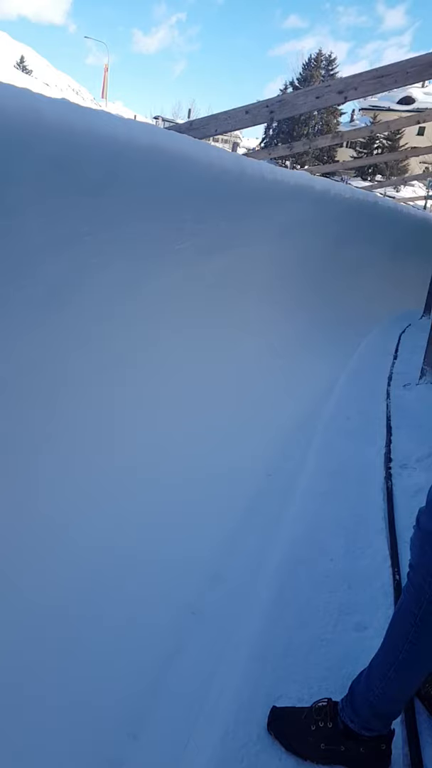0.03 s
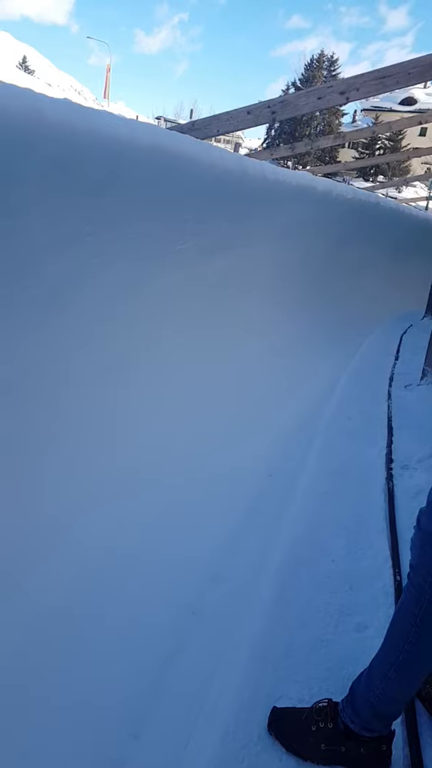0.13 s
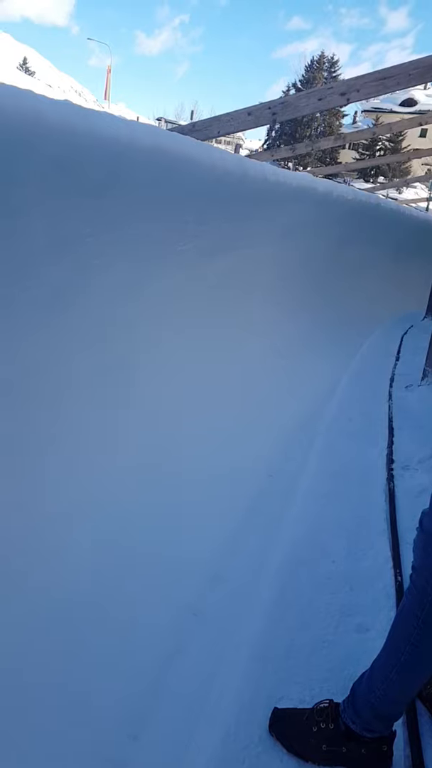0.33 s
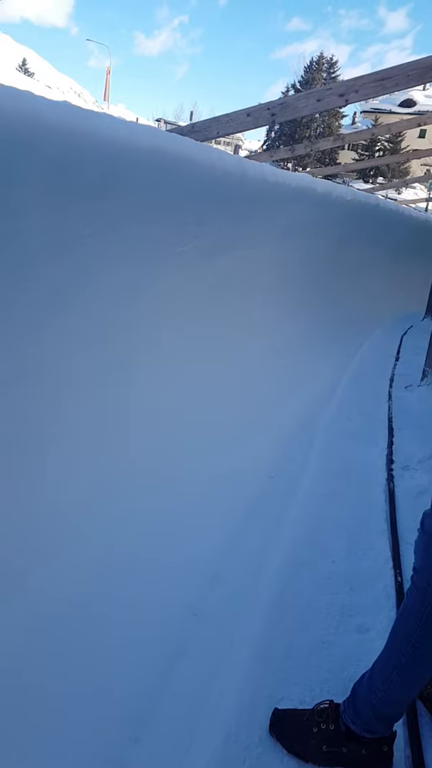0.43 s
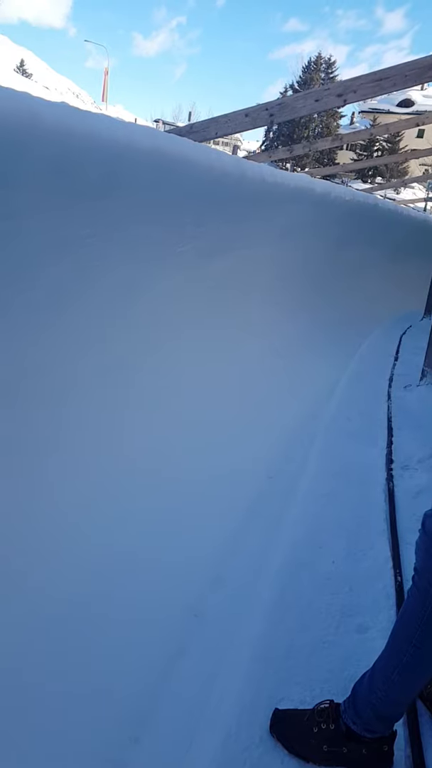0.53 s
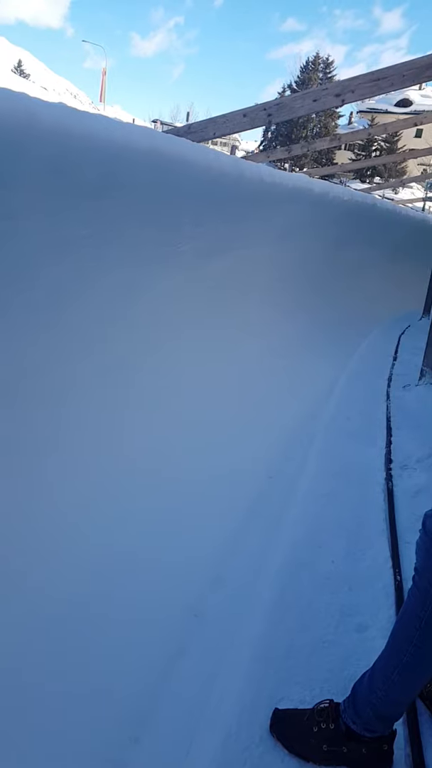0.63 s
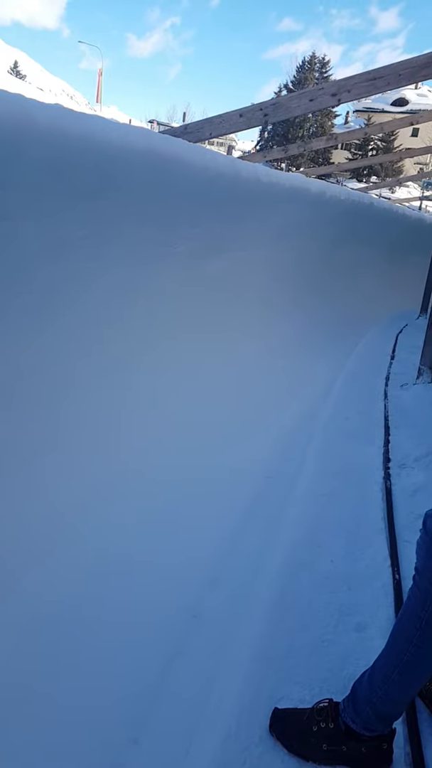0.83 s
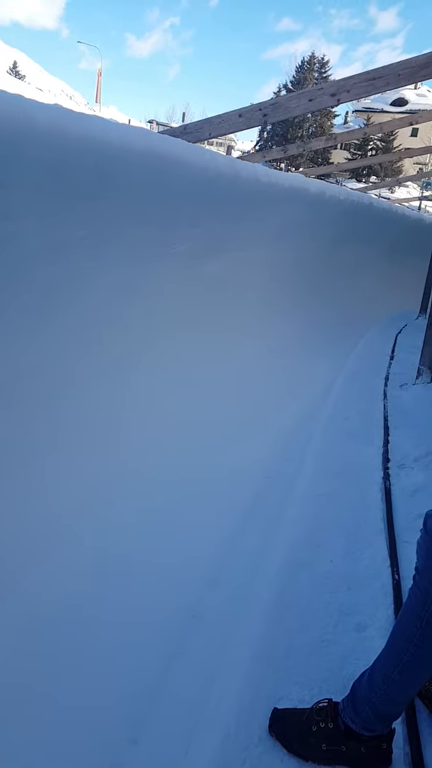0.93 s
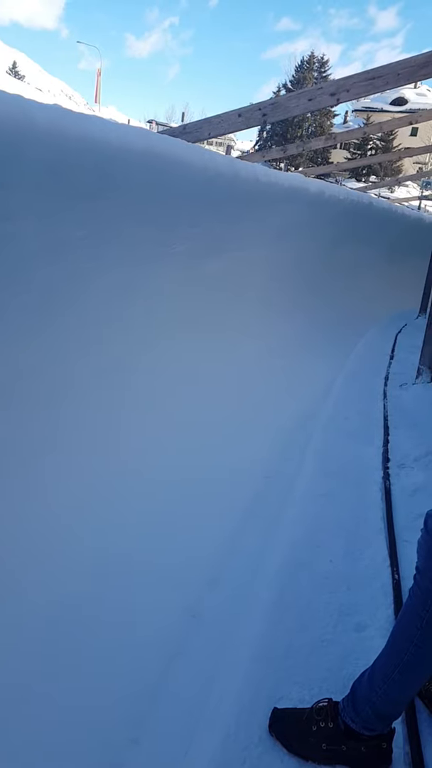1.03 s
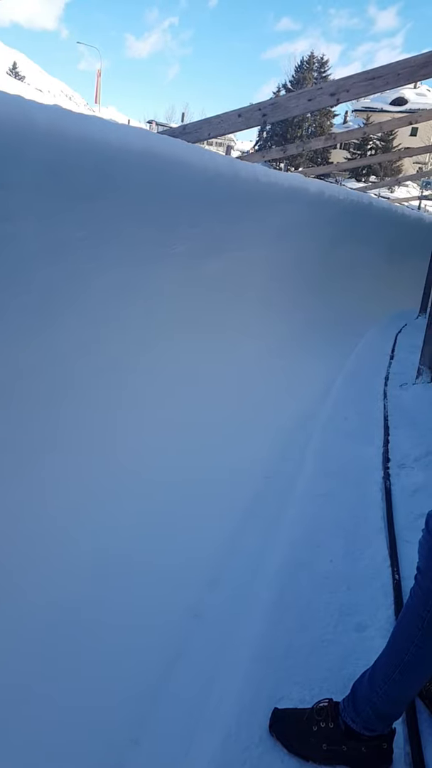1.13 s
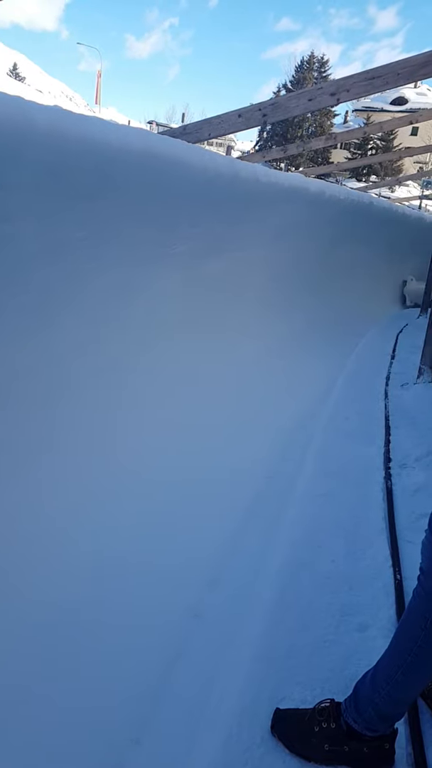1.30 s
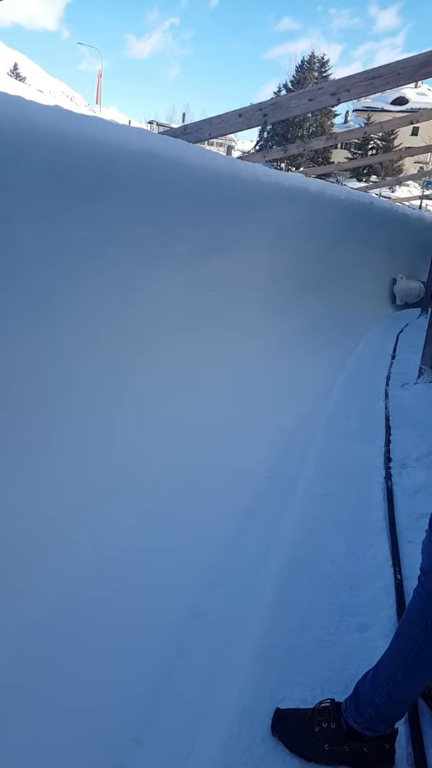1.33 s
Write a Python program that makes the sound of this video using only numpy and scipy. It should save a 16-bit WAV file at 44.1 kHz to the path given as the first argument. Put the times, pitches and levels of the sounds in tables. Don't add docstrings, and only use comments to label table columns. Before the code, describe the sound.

A sled rides through an outdoor ice channel, close to a phone microphone: rapid hollow thuds and deep rumble, gritty runner scraping, sharp clacks and ice cracks, nearing at the end, then cut to faint breeze.

```python
import sys
import numpy as np
from scipy import signal
from scipy.fft import rfft, irfft, next_fast_len
from scipy.io import wavfile
from scipy.ndimage import uniform_filter1d

SR = 44100
rng = np.random.default_rng(int(sys.argv[2]) if len(sys.argv) > 2 else 0)


def master_out(mix):
    frames = np.transpose(np.atleast_2d(mix))
    ceiling = np.clip(frames, -1, 1)
    pcm = np.round(ceiling * 32767).astype(np.int16)
    wavfile.write(sys.argv[1], SR, pcm)


def amplitude_ratio(level_db):
    exponent = np.asarray(level_db, float) / 20
    return 10 ** exponent


N = 85995
T = np.arange(N) / SR

# time in seconds, boom level in dB, deep rumble in dB relative to the boom.
LOAD = [(0.09, -20, -36.5), (0.106, -13, -39.5), (0.164, -20.5, -30), (0.19, -23.5, -15),
        (0.25, -14, -24.5), (0.298, -24, -24.5), (0.316, -17, -14.5), (0.482, -17.5, -0.5),
        (0.632, -15.5, -9), (0.754, -26, 0.5), (0.824, -19, -8.5), (0.938, -18, -2.5), (1.414, -20.5, -6),
        (1.492, -18.5, -0.5), (1.524, -20.5, -10.5), (1.554, -16, -7), (1.638, -19.5, -7.5),
        (1.66, -19.5, -0.5)]
# time in seconds, spray level in dB, level of the bend's hollow howl in dB.
NEAR = [(.09, -75.5, -52), (.3, -74.5, -47.5), (.5, -68, -47), (.75, -68, -57), (.95, -63, -63),
        (1.3, -65.5, -68.5), (1.5, -57.5, -57), (1.56, -57.5, -46.5), (1.6, -55, -30), (1.64, -61, -35),
        (1.67, -48, -36)]


def evened(x):
    return x / np.sqrt(np.mean(x ** 2) + 1e-20)


def steadied(x, span_s, share):
    power = uniform_filter1d(x[0] ** 2, round(span_s * SR)) + 1e-3
    return evened(x / power ** (share / 2))


def read(points, hz):
    f, value = np.transpose(points)
    return np.interp(np.log(hz + 1), np.log(f + 1), value)


def curve(rows, axis=1):
    rows = np.array(rows)
    return np.interp(T, rows[:, 0], rows[:, axis])


def add(mix, s, sound):
    part = mix[..., round(s * SR):][..., :sound.shape[-1]]
    part += sound[..., :part.shape[-1]]


def lowpass(x, order, hz):
    return signal.sosfilt(signal.butter(order, hz, fs=SR, output="sos"), x)


def resonance(x, hz, width_hz):
    turn = np.exp(2j * np.pi * hz * np.arange(x.shape[-1]) / SR)
    r = np.exp(-np.pi * width_hz / SR)
    once = signal.lfilter([1 - r], [1, -r], x / turn)
    twice = signal.lfilter([1 - r], [1, -r], once)
    return (twice * turn).real


def ring(x, modes):
    return evened(sum(amplitude_ratio(db) * evened(resonance(x, hz, width_hz)) for hz, width_hz, db in modes))


def hiss(colour_db, patchy_db, flicker_db, size=512):
    frames = N * 4 // size + 5
    hz = np.fft.rfftfreq(size, 1 / SR)
    z = rng.standard_normal((frames, len(hz), 5)).T
    patches = uniform_filter1d(z[4], size=8, axis=0)
    patches = evened(uniform_filter1d(patches, size=8, axis=1))
    flicker = evened(uniform_filter1d(rng.standard_normal(frames), size=3))
    level_db = colour_db(hz)[:, None] + patchy_db * patches + flicker_db * flicker
    field = (z[:2] + 1j * z[2:4]) * amplitude_ratio(level_db)
    return evened(signal.istft(field, nperseg=size, noverlap=size - size // 4)[1][:, :N])


def knocks(per_s, spread_db, wash):
    hit = (rng.random((2, N)) < per_s / SR) * rng.choice([-1., 1.], (2, N))
    size = amplitude_ratio(spread_db * np.minimum(rng.exponential(1, (2, N)), 4))
    return evened(hit * size) + wash * rng.standard_normal((2, N))


def still_air():
    # frequency in Hz, level in dB per Hz.
    still = [(30, -15.5), (60, -13.5), (110, -31.5), (190, -27), (300, -42.5), (450, -36), (620, -49),
             (800, -51), (2400, -59.5), (2800, -90), (16000, -93)]
    breeze_hz, sway_hz, breeze_db, wash_db = 26.2, 8.5, -40, -46.5
    sway = 1 + 0.35 * np.sin(2 * np.pi * sway_hz * (T - 1.68))
    throb = np.sqrt(2) * sway * np.sin(2 * np.pi * breeze_hz * (T - 1.7025))
    common, side = hiss(lambda hz: read(still, hz), patchy_db=0.8, flicker_db=0.3, size=2048)
    wash = 0.71 * common + 0.53 * side * np.array([[1], [-1]])
    return amplitude_ratio(breeze_db) * throb + amplitude_ratio(wash_db) * wash


def spray(jolt):
    # frequency in Hz, level in dB per Hz.
    dust_colour = [(7000, -25), (8400, 1), (9300, -5.5), (10600, -1.5), (12200, 0), (14000, -5.5),
                   (15500, -8.5)]
    dust = hiss(lambda hz: read(dust_colour, hz), patchy_db=1.2, flicker_db=0.8)
    return dust * amplitude_ratio(curve(NEAR)) * jolt ** 0.12


def cracks():
    # start in seconds, peak level in dB, pitch in Hz.
    snaps = [(.1392, -37, 4500), (0.1855, -45.5, 4400), (0.3108, -34.5, 4470), (0.458, -41.5, 5000),
             (.5134, -31, 3200), (.7174, -36, 3530), (.877, -35, 4200), (.904, -32, 5400),
             (.949, -32, 6000), (0.9825, -33.5, 5500), (.9965, -46, 6000), (1.0368, -25, 2200),
             (1.1, -51, 4200), (1.16, -50, 6400), (1.205, -37, 4900), (1.229, -39.5, 6800),
             (1.24, -39.5, 6500), (1.434, -36, 5000), (1.4931, -40, 5000), (1.5, -38, 6500),
             (1.583, -38, 7000)]
    crack_s, q = 0.0012, 2.5
    t = np.arange(600) / SR
    out = np.zeros((2, N))
    for (s, db, hz), noise in zip(snaps, rng.standard_normal((len(snaps), 2, len(t)))):
        edges = [hz / (1 + 0.5 / q), hz * (1 + 0.5 / q)]
        band = signal.butter(2, edges, "band", fs=SR, output="sos")
        snap = signal.sosfilt(band, noise * t * np.exp(-t / crack_s))
        add(out, s, amplitude_ratio(db) * snap / abs(snap[0]).max())
    return out


def steel_db(hz):
    # frequency in Hz, level in dB per Hz.
    slope = [(260, -30.5), (440, -16), (581, 0), (1130, -8), (1900, -9), (2640, -14), (4790, -16.5),
             (7930, -27), (9000, -51), (11700, -79), (19800, -120)]
    # frequency in Hz, width in Hz, lift in dB.
    steel_modes = [(476, 72, 20.5), (670, 160, -2.5), (2690, 680, -6), (3390, 140, 5.5), (4630, 320, 1.5),
                   (5700, 600, -3), (6640, 390, 3)]
    lift = sum(db / (1 + (2 * (hz - f) / width) ** 2) for f, width, db in steel_modes)
    return read(slope, hz) + lift


def ice_ticks():
    size = amplitude_ratio(4.2 * np.minimum(rng.exponential(1, N), 4))
    hits = (rng.random(N) < 260 / SR) * size
    return signal.lfilter([1], [1, -np.exp(-1 / (0.0015 * SR))], hits)


def joint_clacks():
    # start in seconds, peak level in dB, ringing pitch in Hz, body level in dB.
    joints = [(0.0995, -33, 3360, -27.5), (0.1393, -68, 4200, -29.5), (0.185, -32.5, 4380, -28.5),
              (0.222, -30.5, 4530, -59.5), (0.3132, -22, 3300, -26.5), (0.3347, -51, 3100, -37.5),
              (0.4015, -31.5, 3980, -27.5), (0.455, -25.5, 4250, -24), (0.5268, -17.5, 1800, -25.5),
              (0.5781, -28, 4180, -39.5), (0.6, -35, 4400, -33), (0.6414, -35, 3240, -33),
              (0.6811, -26, 3380, -53), (0.8386, -37.5, 4550, -37.5), (0.8757, -38.5, 4130, -31.5),
              (0.9003, -27.5, 3270, -35.5), (0.946, -24, 3560, -28), (0.9816, -32, 2400, -53),
              (1.0355, -33.5, 3580, -24), (1.1171, -23, 3130, -45.5), (1.229, -27.5, 2220, -42),
              (1.299, -32, 5070, -55), (1.371, -27, 4690, -57), (1.3934, -28, 3750, -37),
              (1.4553, -30, 4670, -55), (1.5005, -29.5, 3250, -30), (1.519, -24.5, 3380, -38),
              (1.5723, -21, 3430, -39), (1.6187, -27.5, 3120, -44.5)]
    t = np.arange(3000) / SR
    crunch, chink = np.zeros(N), np.zeros((2, N))
    fall = np.exp(-t / 0.0031) + 0.22 * np.exp(-t / 0.055)
    surge = np.minimum(t / 0.0019, 1) * fall
    strike = np.minimum(t / 0.0036, 1) * np.exp(-t / 0.0099)
    for (s, db, hz, body_db), noise in zip(joints, rng.standard_normal((len(joints), 2, len(t)))):
        add(crunch, s, amplitude_ratio(2 * (body_db - 4.5)) * surge)
        modes = [(hz, 900, 0), (4700, 1500, -10), (1700, 1400, -5)]  # Hz, width Hz, dB
        rung = sum(amplitude_ratio(lift_db) * resonance(noise * strike, f, width) for f, width, lift_db in modes)
        add(chink, s, amplitude_ratio(db - 4.5) * rung / abs(rung[0]).max())
    return crunch, chink


def runners():
    # time in seconds, scrape level in dB.
    press = [(.09, -40.5), (.2, -46), (.3, -40), (.45, -39.5), (.51, -46.5), (.56, -38.5), (.62, -38.5),
             (.68, -43.5), (.76, -44), (.88, -41.5), (1.0, -40), (1.15, -39.5), (1.34, -43), (1.45, -40.5),
             (1.55, -35.5), (1.63, -35), (1.67, -35)]
    scrape = hiss(steel_db, patchy_db=1.95, flicker_db=1.0)
    grit = amplitude_ratio(-14) * ice_ticks()
    crunch, chink = joint_clacks()
    base = amplitude_ratio(curve(press))
    pressure = np.sqrt(base ** 2 + crunch)
    dull = lowpass(scrape, 2, 2500)
    bright = scrape - dull
    smooth = dull * pressure + bright * base ** 0.51 * pressure ** 0.5
    gritty = lowpass(grit * smooth, 4, 7000)
    return smooth + gritty + chink, pressure / base


def howl():
    # frequency in Hz, width in Hz, level in dB.
    howl_modes = [(481, 17, 1.5), (538.5, 48, -2.5), (619, 49, -3)]
    return ring(knocks(per_s=340, spread_db=2.5, wash=0.66), howl_modes) * amplitude_ratio(curve(NEAR, axis=2))


def deep_rumble():
    # frequency in Hz, width in Hz, level in dB.
    deep_modes = [(81, 25, 1), (99.4, 31.2, 6.5), (146.1, 60, -3)]
    shaken = ring(knocks(per_s=95, spread_db=4.5, wash=0.71), deep_modes)
    return steadied(shaken, span_s=0.1, share=1.0) * amplitude_ratio(curve(LOAD) + curve(LOAD, axis=2) - 2.6)


def heavy_bumps():
    # start in seconds, peak level in dB, pitch in Hz, swell time in seconds.
    thuds = [(0.103, -11, 175, .0055), (0.137, -15, 164, .012), (0.237, -12, 170, .011),
             (0.318, -10, 191, .0055), (0.339, -14, 183, .004), (0.359, -14, 186, .007),
             (0.41, -14, 205, .014), (0.445, -17, 105, .012), (0.463, -16, 207, .006),
             (0.49, -16, 140, .007), (0.515, -15, 225, .009), (0.538, -9, 178, .007),
             (0.575, -14, 150, .006), (0.606, -11, 156, .007), (0.622, -14, 205, .009),
             (0.639, -9, 164, .0055), (0.675, -15, 190, .006), (0.706, -16, 145, .006),
             (0.785, -18, 167, .006), (0.836, -15, 178, .009), (0.873, -14, 188, .0055),
             (0.905, -15, 185, .008), (0.945, -7, 194, .0055), (0.969, -12, 183, .0055),
             (1.005, -15, 185, .007), (1.039, -11, 178, .01), (1.07, -13, 185, .012),
             (1.106, -14, 175, .006), (1.119, -12, 159, .0055), (1.16, -16, 185, .008),
             (1.225, -14, 191, .008), (1.25, -18, 125, .01), (1.271, -17, 182, .014),
             (1.31, -18, 188, .012), (1.345, -15, 200, .012), (1.42, -17, 110, .007),
             (1.445, -16, 178, .006), (1.472, -14, 220, .01), (1.543, -13, 190, .007),
             (1.574, -13, 180, .01), (1.612, -15, 135, .006), (1.646, -12, 180, .007),
             (1.6592, -16, 72, .011)]
    t = np.arange(0, 0.1, 1 / SR)
    bumps, held = np.zeros(N), np.zeros(N)
    for s, db, hz, swell_s in thuds:
        u = t / swell_s
        swing = amplitude_ratio(db + 15.5) * u ** 2 * np.exp(-1.9 * u)
        add(bumps, s, -swing * np.sin(2 * np.pi * hz * t))
        add(held, s, swing)
    return bumps, held


def boom():
    # frequency in Hz, width in Hz, level in dB.
    boom_modes = [(178.2, 31.7, 0), (211.8, 75, 1.5), (287, 50.4, -11.5)]
    shaken = ring(knocks(per_s=170, spread_db=3.5, wash=0.66), boom_modes)
    body = steadied(shaken, span_s=0.03, share=0.48) * amplitude_ratio(curve(LOAD) - 4.0)
    bumps, held = heavy_bumps()
    body = body / (1 + 0.45 * held / amplitude_ratio(curve(LOAD)))
    direct_and_scattered = np.array([[1], [0.3]])
    return body + direct_and_scattered * bumps + deep_rumble() + howl()


def ports(pair):
    # frequency in Hz, shared part from 0 to 1.
    likeness = [(60, 0.98), (250, 1), (500, 0.81), (1000, 0.35), (2000, 0.92), (4000, 0.25), (8000, 0.43),
                (15000, 0.17)]
    # frequency in Hz, left over right in dB.
    balance = [(60, -1), (130, 0.5), (290, -3.5), (640, -3), (1400, 2), (2500, 1), (4500, -3.5), (8500, 1),
               (13000, -2)]
    gap_s, low_cut_hz, top_hz = 0.00011, 48, 15400
    size = next_fast_len(N)
    hz = np.fft.rfftfreq(size, 1 / SR)
    direct, scattered = rfft(pair, size)
    same = np.clip(read(likeness, hz), 0, 1)
    lean = amplitude_ratio(read(balance, hz) / 2)
    right = same * direct + np.sqrt(1 - same ** 2) * scattered
    right = right * np.exp(-2j * np.pi * hz * gap_s)
    band = 1 / (1 + (low_cut_hz / (hz + 1)) ** 4) / (1 + (hz / top_hz) ** 80)
    return irfft(band * np.array([direct * lean, right / lean]), size)[:, :N]


def scene():
    cut_in_s, fade_in_s, cut_out_s, fade_out_s = 0.0862, 0.0006, 1.6696, 0.0001
    steel, jolt = runners()
    steel = lowpass(steel + cracks(), 10, 8350)
    sled = ports(boom() + steel + spray(jolt))
    before = np.clip((T - cut_in_s) / fade_in_s, 0, 1)
    after = np.clip((T - cut_out_s) / fade_out_s, 0, 1)
    return sled * before * (1 - after) + still_air() * after


def low_pass(x):
    return signal.sosfilt(signal.butter(12, 16370, fs=SR, output="sos"), x)


def record(dry):
    ceiling = 0.75
    mix = ceiling * np.tanh(dry / ceiling)
    return low_pass(mix)


dry = scene()
out = record(dry)
master_out(out)
```